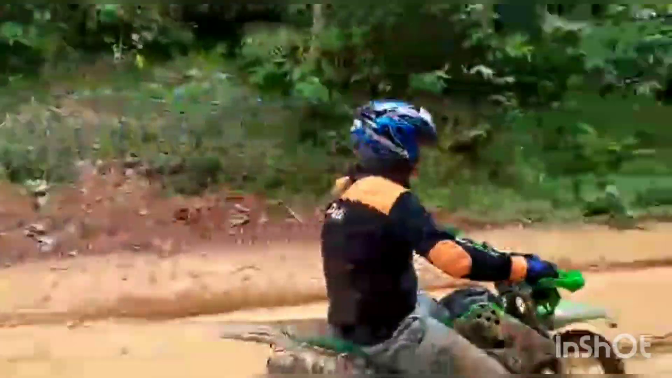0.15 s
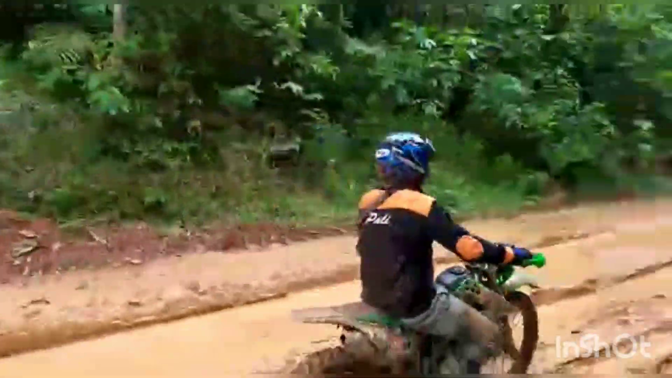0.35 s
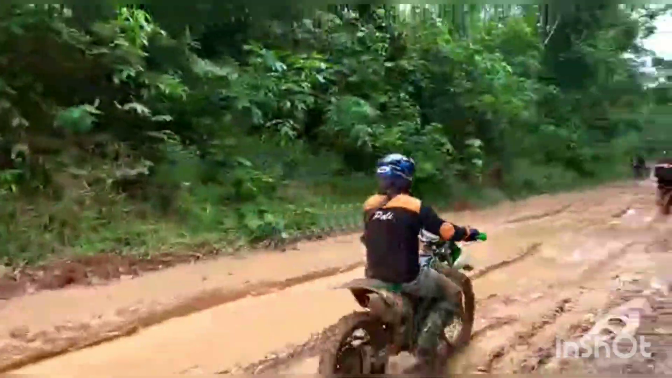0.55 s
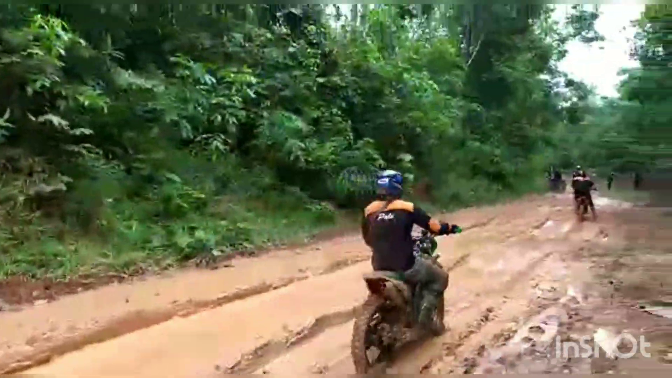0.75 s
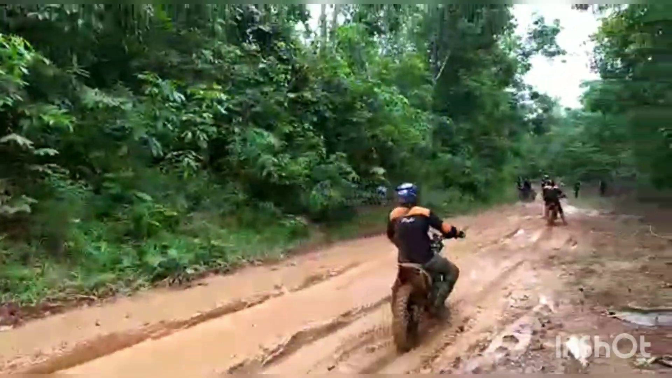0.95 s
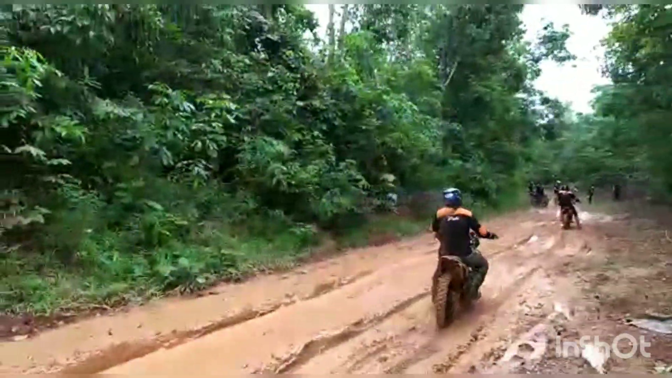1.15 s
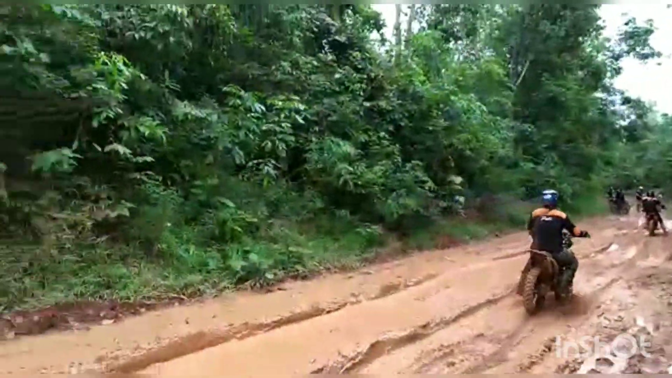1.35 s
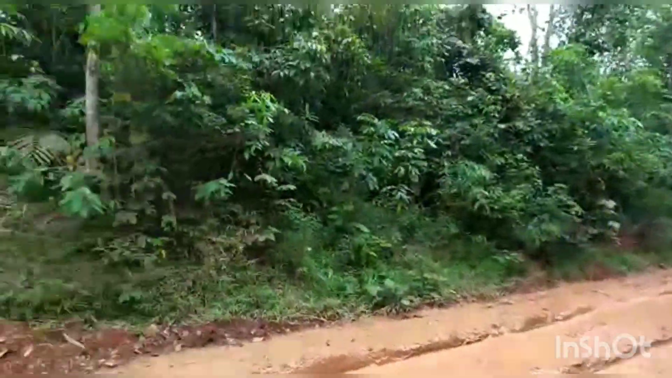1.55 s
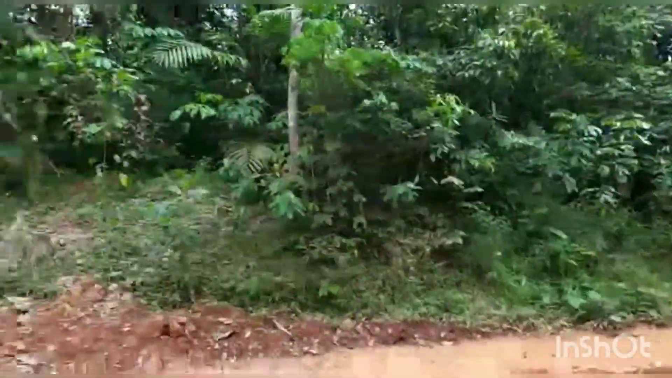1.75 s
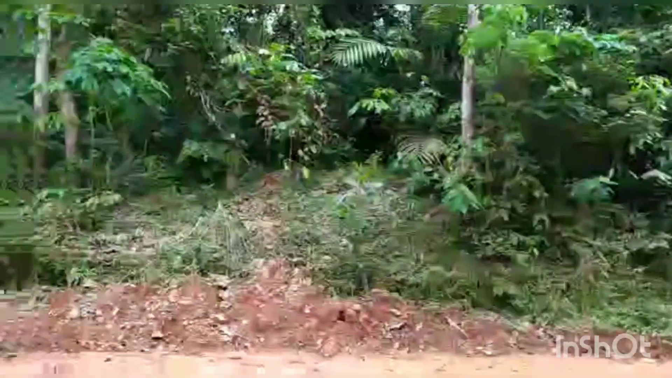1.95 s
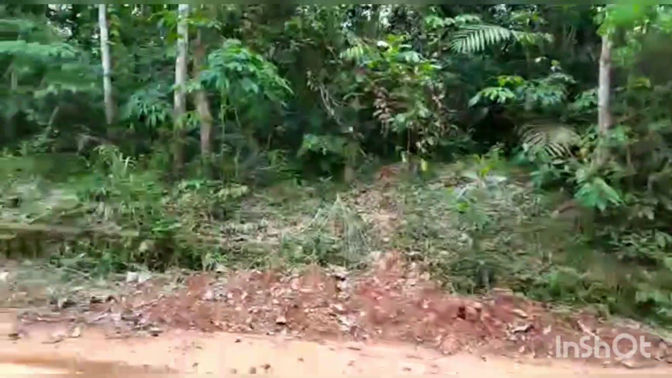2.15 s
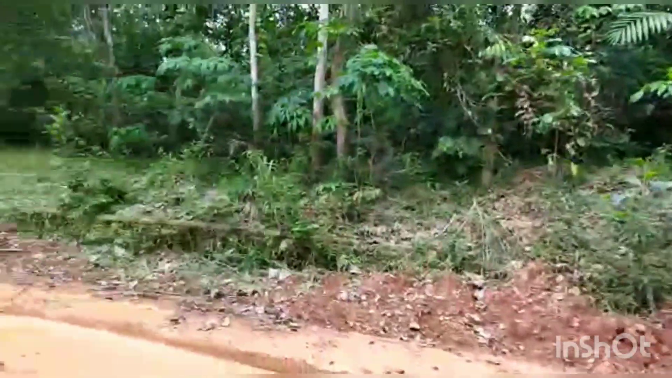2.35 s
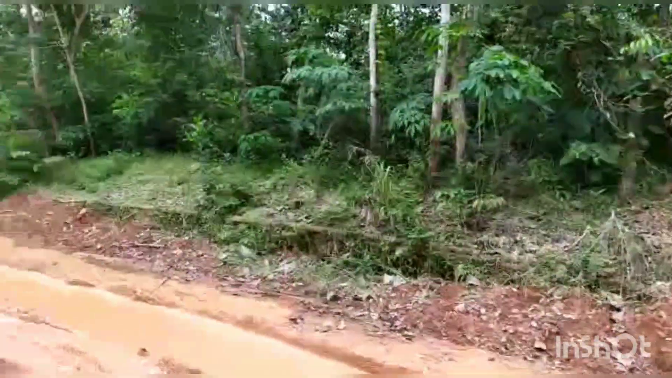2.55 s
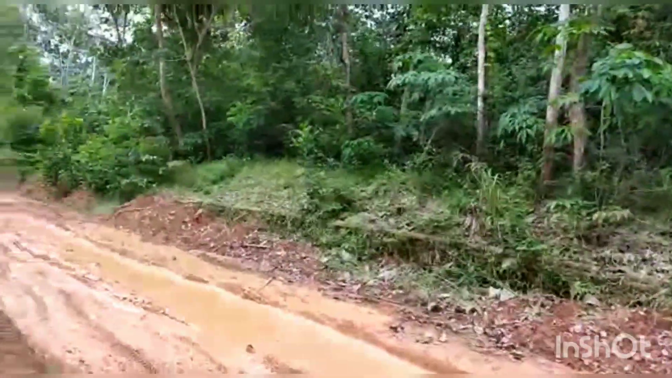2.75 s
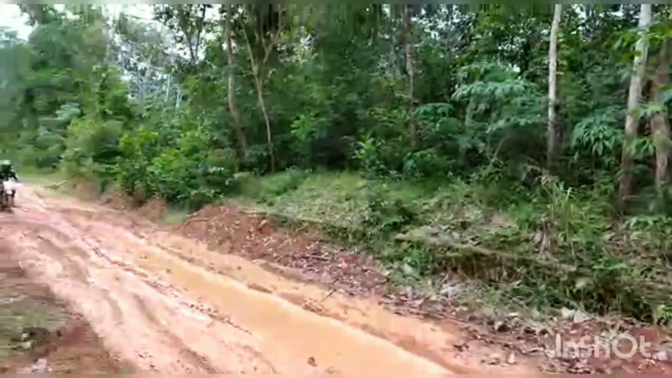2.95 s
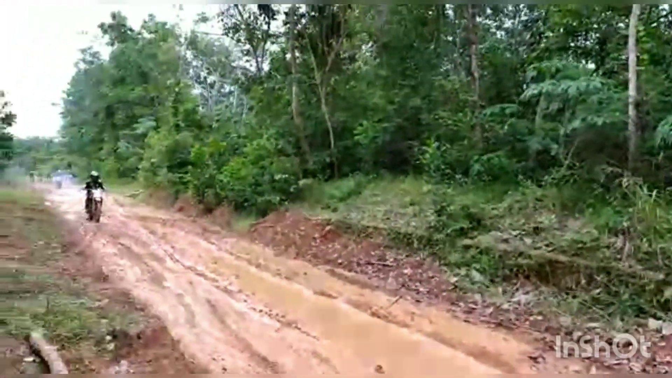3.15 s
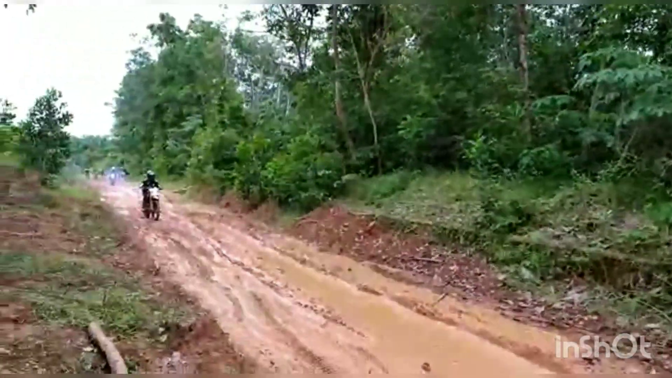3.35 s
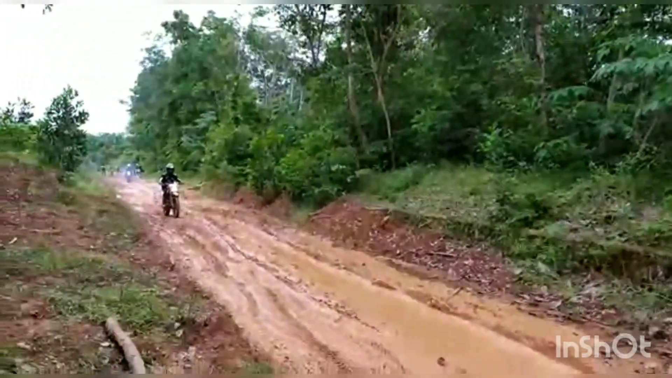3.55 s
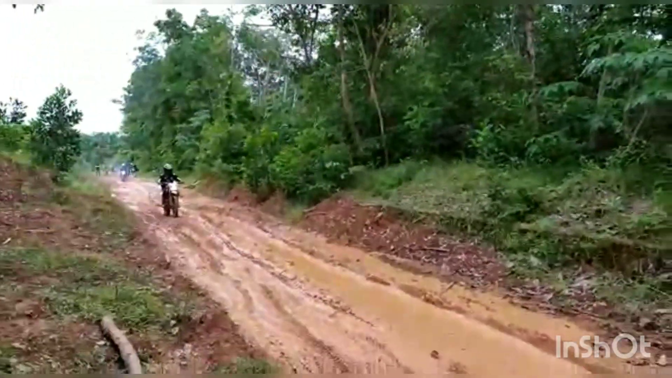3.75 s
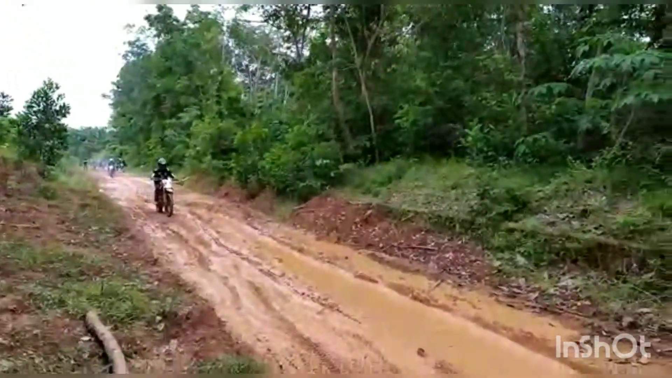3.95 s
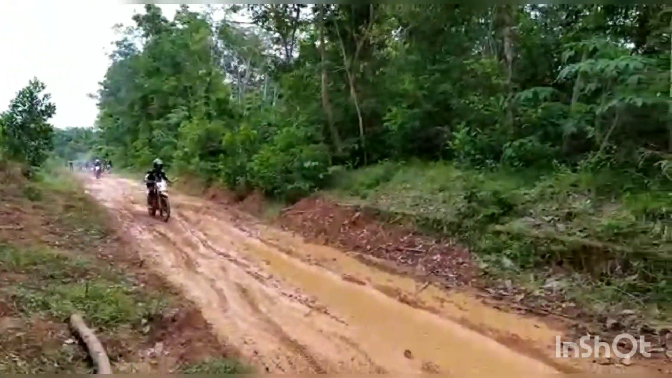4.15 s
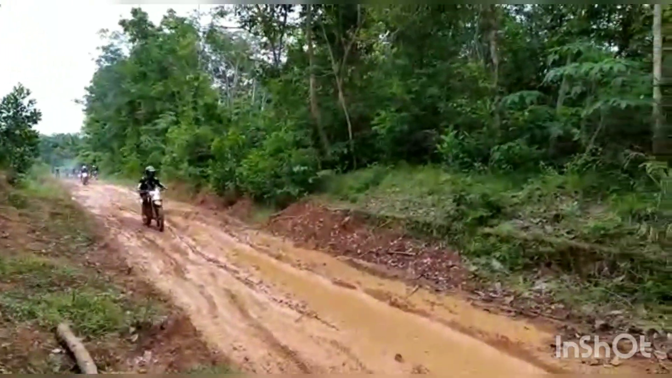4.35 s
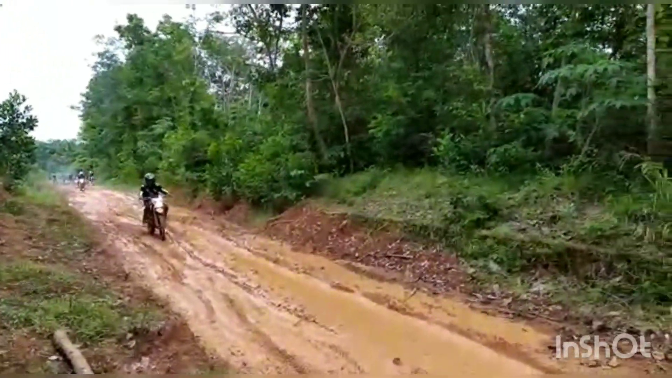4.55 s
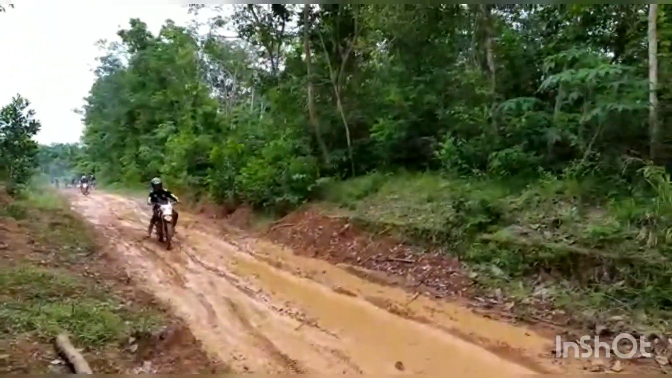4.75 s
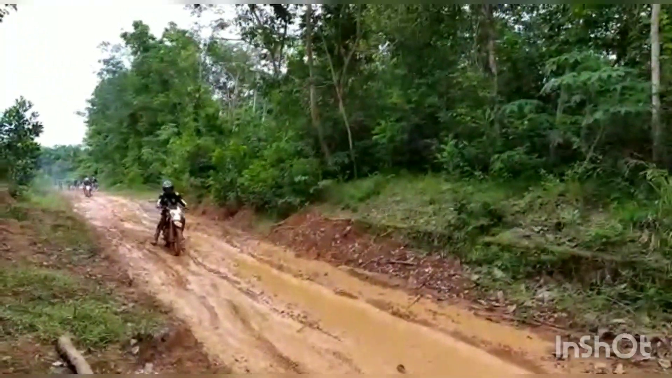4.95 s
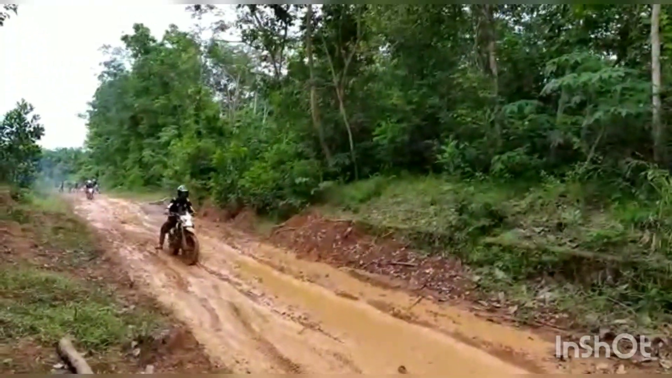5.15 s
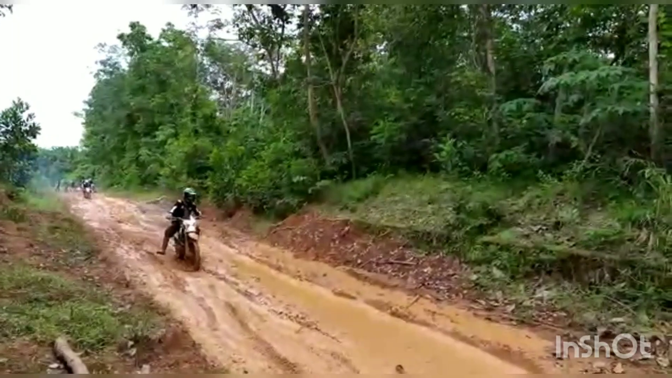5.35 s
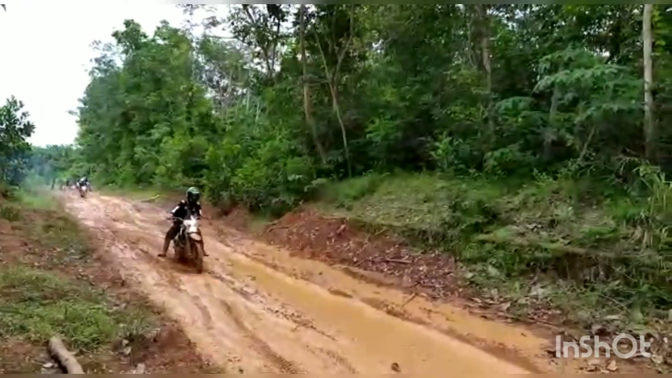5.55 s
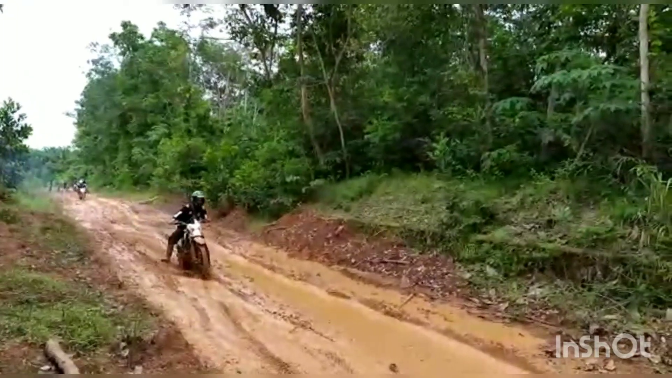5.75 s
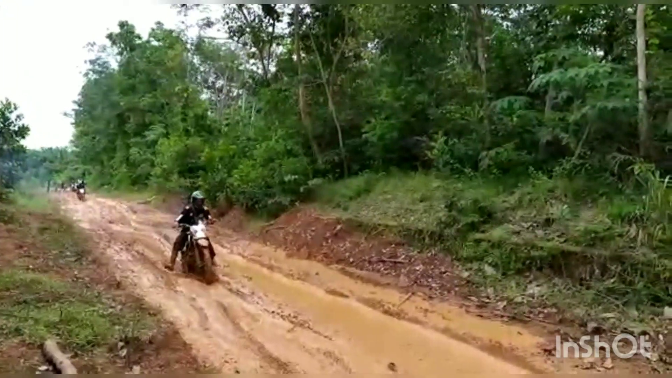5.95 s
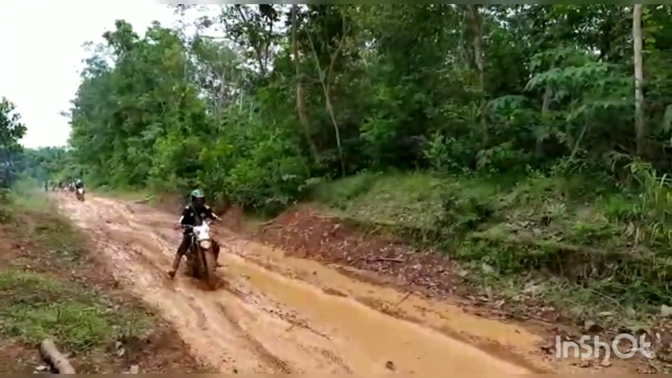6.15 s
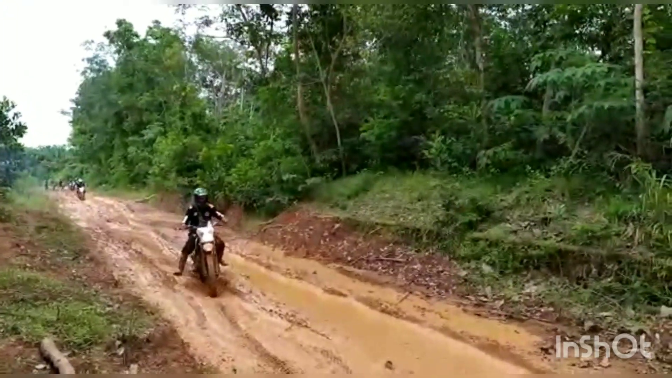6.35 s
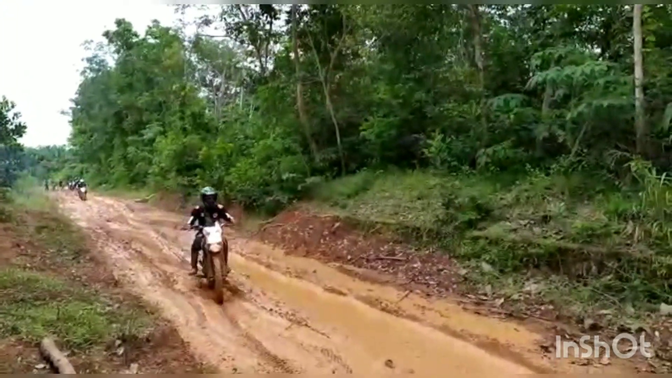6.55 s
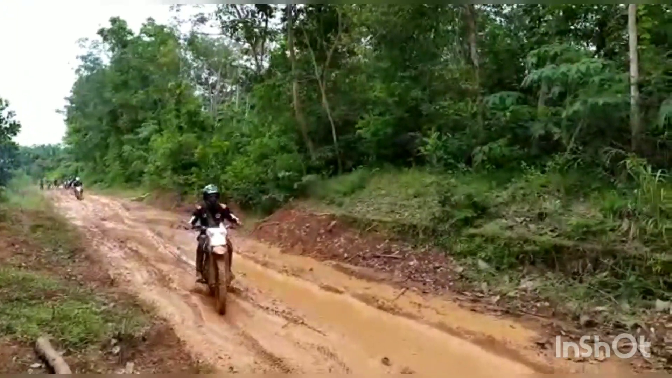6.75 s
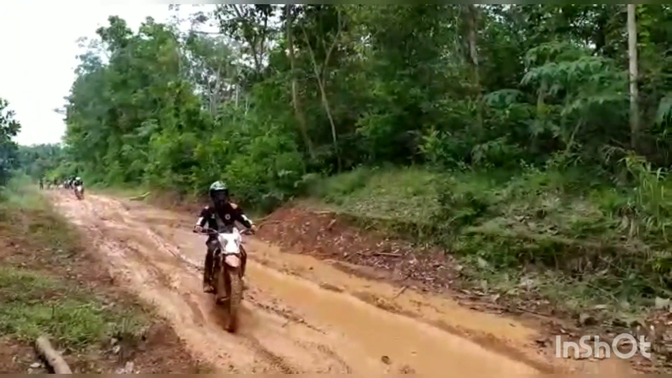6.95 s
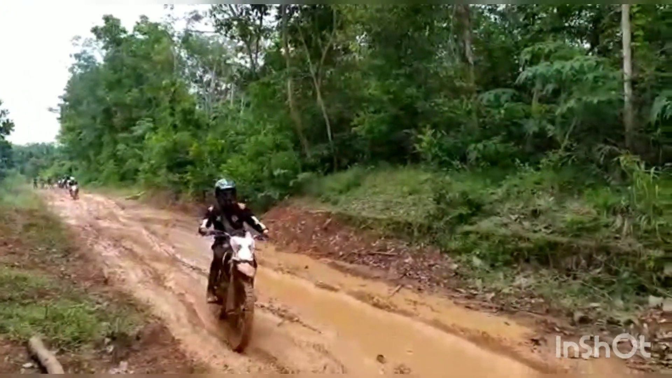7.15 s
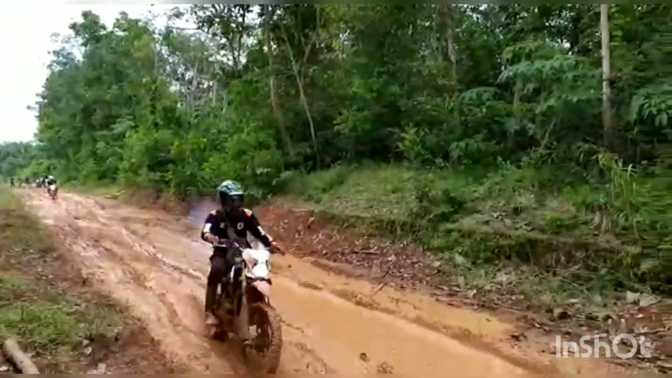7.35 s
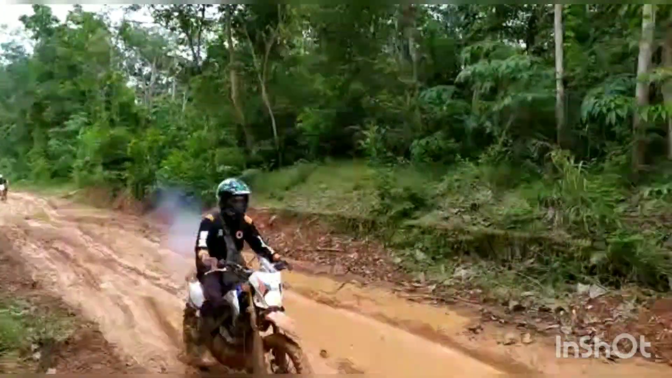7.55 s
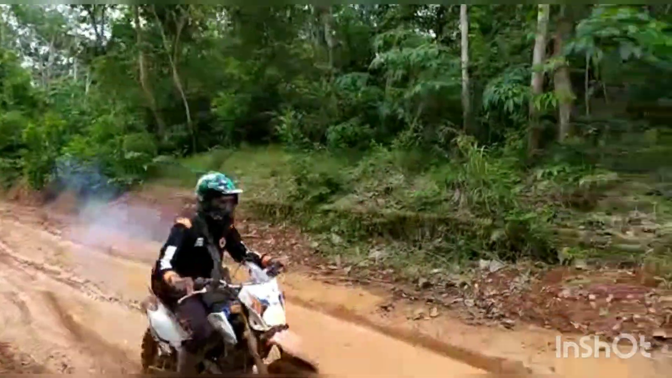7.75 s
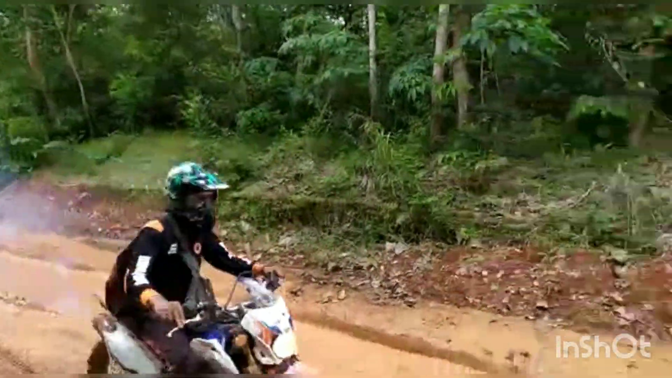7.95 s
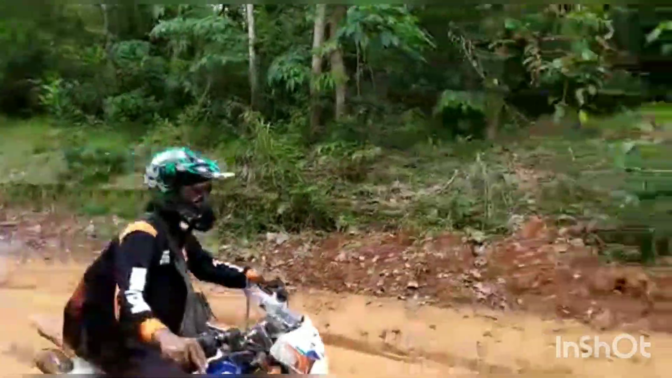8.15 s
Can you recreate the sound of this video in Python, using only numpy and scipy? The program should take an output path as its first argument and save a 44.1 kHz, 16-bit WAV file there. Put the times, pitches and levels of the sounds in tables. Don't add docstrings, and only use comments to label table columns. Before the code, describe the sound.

Raspy single-cylinder dirt bike engines outdoors: one pulls away, another putters through muddy ruts, then opens up and passes very close.

```python
import sys
import numpy as np
from scipy import signal
from scipy.fft import rfft, irfft
from scipy.io import wavfile
from scipy.ndimage import uniform_filter1d

SR = 44100
rng = np.random.default_rng(int(sys.argv[2]) if len(sys.argv) > 2 else 0)


def wav_record(signal):
    frames = np.transpose(np.atleast_2d(signal))
    bounded = np.clip(frames, -1, 1)
    quanta = np.round(bounded * 32767).astype(np.int16)
    wavfile.write(sys.argv[1], SR, quanta)


def how_loud(loudness_db):
    steps = np.asarray(loudness_db, float) / 20
    return 10 ** steps


N = 361619


def rms_one(x):
    return x / np.sqrt(np.mean(x ** 2) + 1e-20)


def in_time(rows):
    s, *columns = np.transpose(rows)
    return [np.interp(np.arange(N) / SR, s, column) for column in columns]


def at_hz(points, size):
    hz = np.maximum(np.arange(size // 2 + 1) * SR / size, 1)
    point_hz, point_db = np.array(points).T
    return np.interp(np.log(hz), np.log(point_hz), point_db)


def colour(x, points, size=8192):
    cepstrum = irfft(np.log(how_loud(at_hz(points, size))), size)
    cepstrum[1:size // 2] *= 2
    cepstrum[size // 2 + 1:] = 0
    response = irfft(np.exp(rfft(cepstrum)), size)
    return signal.fftconvolve(np.atleast_2d(x), response[None, :size // 2])[:, :N]


def voiced(pulses, spectrum):
    return colour(pulses, spectrum) / np.linalg.norm(colour(np.ones(1), spectrum))


def drift(rate_hz):
    r = np.exp(-2 * np.pi * rate_hz / SR)
    noise = rng.standard_normal(N + SR)
    settled = signal.lfilter([1], [1, -2 * r, r * r], noise)[SR:]
    return rms_one(settled)


def pair_noise(alike):
    both, left, right = rng.standard_normal((3, N))
    return np.sqrt(alike) * both + np.sqrt(1 - alike) * np.array([left, right])


def pipe(x, lag_s, g):
    gap = np.zeros(int(lag_s * SR) - 1)
    return signal.lfilter(np.r_[g, gap, -1], np.r_[1, gap, -g], x + 1e-18)


def running_gear(spectrum, split_hz=5000):
    hiss = 0
    for side in "low", "high":
        grains = how_loud(1.55 * (drift(146) + 0.5 * drift(6) + 0.55 * drift(3.4)))
        band = signal.butter(2, split_hz, side, fs=SR, output="sos")
        hiss = hiss + signal.sosfilt(band, pair_noise(0.07) * grains)
    return rms_one(colour(hiss, spectrum))


def throttle_opening(throttle):
    t, twist_s = np.arange(N) / SR, 0.019
    opening = np.zeros(N)
    for opens_s, shuts_s, amount in throttle:
        opened = np.clip((t - opens_s) / twist_s + 0.5, 0, 1)
        shut = np.clip((t - shuts_s) / twist_s + 0.5, 0, 1)
        opening += amount * (opened - shut)
    return opening


def load(revs, route, throttle, law, song):
    near_db, churn_db, broadside = in_time(route)
    opening = throttle_opening(throttle)
    on_song = 1 + song["by_throttle"] * opening + song["by_revs"] * revs
    drone = np.clip(broadside * on_song, 0, 1)
    voices = []
    for base_db, open_db, near_share, churn_share, rev_db in law:
        voices.append(base_db + open_db * opening + near_share * near_db + churn_share * churn_db + rev_db * revs)
    thump_db, bark_db, spit_db, hiss_db = voices
    thump_db = thump_db - law[0][1] * opening * np.clip(1.35 * drone, 0, 1)
    end_on = np.clip(1 - 2.5 * drone, 0, 1)
    bark_db = bark_db - song["end_on_loss_db"] * np.clip(1 - opening, 0, 1) * end_on
    return thump_db, bark_db, spit_db, hiss_db, drone


# (frequency [Hz], level [dB per Hz])
JET = [(350, -28), (600, 1), (1340, -5), (1490, -5.5), (2540, -13.5), (3710, -15.5), (5150, -14),
       (10200, -22.5), (15500, -47)]
# (frequency [Hz], level [dB per Hz])
TAILPIPE_RING = [(150, -26), (280, -2), (440, 3), (590, -4), (720, -28), (840, -12), (1100, -35),
                 (1600, -38.5)]
# (frequency [Hz], level [dB per Hz])
SHOCK_FRONT = [(1500, -36), (3000, -18), (6000, -13), (8500, -4), (10500, 0), (12500, -5), (15500, -16)]


def engine(speed, route, throttle, law, song, thump_body, bark_body, gear_hiss=None,
           drone_phase=0, crack_db=0, behind_s=0, drone_lag=0):
    (per_s,), t = in_time(speed), np.arange(N) / SR
    revs = np.clip(per_s - song["from_per_s"], 0, song["to_per_s"] - song["from_per_s"])
    thump_db, bark_db, spit_db, hiss_db, drone = load(revs, route, throttle, law, song)
    share = np.clip(drone, 0, 0.95)
    running = (t >= route[0][0]) & (t <= route[-1][0])
    fade = uniform_filter1d(running * 1.0, 600)

    cycles = np.cumsum(per_s) / SR
    cycles += 0.0015 * per_s - cycles[int(speed[0][0] * SR)]
    at = np.flatnonzero(np.diff(np.floor(cycles)) * running[1:])
    uneven_db = np.interp(per_s[at], [22, 32], [2.0, 0.7])
    thump_chance, bark_chance = rng.standard_normal((2, len(at))) * uneven_db
    unit = np.sqrt(SR / per_s[at])

    thump, bark = np.zeros((2, N))
    behind = (behind_s * SR * np.clip(1 - 2.5 * share[at], 0, 1)).astype(int)
    thump_at = np.minimum(at + behind, N - 1)
    thump[thump_at] = unit * how_loud(thump_db[at] + 0.5 + thump_chance) * np.sqrt(1 - share[at])
    late = (rng.random(len(at)) * 0.00025 * SR).astype(int)
    bark[np.minimum(at + late, N - 1)] = unit * how_loud(bark_db[at] + 6.0 + bark_chance)
    open_pipe = voiced(bark * (1 - 0.71 * share), bark_body)
    pulses = pipe(voiced(thump, thump_body) + open_pipe, lag_s=0.0019, g=0.6)
    pulses += voiced(-bark * share * how_loud(-8.0), TAILPIPE_RING)

    low_orders = np.cos(4 * np.pi * cycles + drone_phase - drone_lag * revs)
    low_orders += how_loud(-25.0) * np.cos(2 * np.pi * cycles)
    steady = np.sqrt(2 * share) * how_loud(thump_db) * low_orders
    if gear_hiss is None:
        return pulses + fade * steady

    since_s = cycles % 1 / per_s
    jet = rms_one(colour(pair_noise(0.66), JET))
    jet *= 0.5 + 1.9 * np.exp(-since_s / 0.005)
    crack = rms_one(colour(pair_noise(0.092), SHOCK_FRONT)) * np.exp(-since_s / 0.00076)
    steady = steady + how_loud(spit_db) * jet + how_loud(bark_db + crack_db) * crack
    steady += how_loud(hiss_db + 2.0) * running_gear(gear_hiss)
    return pulses + fade * steady


# (frequency [Hz], level [dB per Hz])
AIR_SPECTRUM = [(15, -3.5), (25, -56), (63, -9), (102, 6.5), (270, 9), (492, -2.5), (638, -8.5),
                (1200, -14.5), (1560, -100), (2640, -120)]


def moving_air():
    return how_loud(-41) * rms_one(colour(pair_noise(0.99), AIR_SPECTRUM))


# (time [s], firing rate [per s])
LEAVING_REVS = [(0.008, 48.49), (0.238, 40.97), (0.448, 34.55), (0.53, 39.32), (0.588, 46.75),
                (0.773, 37.26), (1.12, 28.34), (1.248, 40.53), (1.438, 45.53), (1.553, 40.11),
                (1.998, 27.07), (2.06, 30.6), (2.125, 35.8), (2.255, 35.6), (2.29, 28)]
# (time [s], exhaust nearness [dB], wheel churn [dB], broadside [0-1])
LEAVING_PATH = [(0, -3, 3, 0.48), (.3, 1, -2.6, 0.46), (0.602, -6, 2.5, 0.3), (.66, -2, -1.5, 0.03),
                (1.1, -10, -5.5, 0), (1.45, -8, -4.5, 0.03), (1.749, -8.5, -8, 0.04),
                (2.03, -9, -13.5, 0.06), (2.34, -11.5, -15, .04)]
# (opens [s], shuts [s], opening [0-1])
LEAVING_WRIST = [
    (-.02, 0.087, 0.83),
    (0.486, 0.62, 0.74),
    (1.149, 1.463, 0.92),
    (2.05, 2.285, 0.82),
]
# (level alongside [dB], full throttle adds [dB], share of nearness [-],
# share of churn [-], rise with revs [dB per extra firing a second])
LEAVING_VOICES = [(-13, -19, 0.23, 0.21, 0.33), (-22, 16, 1.45, 0, 0.41), (-28, 11, 0.83, 0.64, 0.26),
                  (-27.5, 5, 0.093, 1, 0.0738)]
# (frequency [Hz], level [dB per Hz])
LEAVING_SILENCER = [(30, -31.5), (45, -20), (60, -37), (85, 6), (112, 3.5), (165, 1.5), (210, -2.5),
                    (250, -8), (350, -24.5), (440, -21.5), (550, -25.5), (900, -81.5)]
LEAVING_OPEN_PIPE = [(30, -41), (54, -27), (71, -3.5), (119, -1), (169, 1), (284, -7), (338, -2),
                     (382, -12), (478, -8), (541, -15), (627, -16), (1110, -35.5), (3000, -63),
                     (5000, -49.5)]
LEAVING_GEAR = [(530, -30), (900, -7.5), (1230, -10.5), (1330, -8), (1770, -5), (2420, -3), (3710, -3.5),
                (4880, -10), (7230, -8.5), (10700, -14.5), (15500, -26)]


def leaving_bike():
    song = dict(from_per_s=28.7, to_per_s=35.1, by_throttle=2.34, by_revs=0.001, end_on_loss_db=8.8)
    return engine(LEAVING_REVS, LEAVING_PATH, LEAVING_WRIST, LEAVING_VOICES, song,
                  LEAVING_SILENCER, LEAVING_OPEN_PIPE, LEAVING_GEAR,
                  drone_phase=2.1, crack_db=-11, behind_s=0.004)


# (delay [s], level [dB])
REFLECTIONS = [
    (.016, -12),
    (.043, -18),
    (.071, -21),
    (.118, -23),
    (.19, -26),
]


def forest(x):
    dull = signal.sosfilt(signal.butter(2, 900, fs=SR, output="sos"), x)
    out = np.zeros((2, N))
    for k, (lag_s, db) in enumerate(REFLECTIONS):
        for port in range(2):
            lag = int(lag_s * SR * (1 + 0.005 * k * port))
            out[port, lag:] += how_loud(db) * dull[port, :N - lag]
    return out


# (time [s], length [s], level [dB], pitch [Hz])
MUD_THROWS = [
    (.34, .16, -28, 3350),
    (0.656, 0.29, -39, 3280),
    (1.55, 0.21, -55, 3030),
    (5.165, .16, -46, 9500),
    (6.4, .3, -48, 4200),
    (7.74, 0.085, -28, 4750),
    (7.92, .11, -28, 3660),
]


def sprays():
    width_oct, rise_s, grain_db = 0.37, 0.013, 3.0
    out = np.zeros((2, N))
    grains = pair_noise(0.13) * how_loud(grain_db * drift(60))
    for s, length_s, db, hz in MUD_THROWS:
        start, t = int(s * SR), np.arange(int(length_s * 1.3 * SR)) / SR
        here = slice(start, start + len(t))
        edges = hz * 2 ** (width_oct * hz / 4000 * np.array([-0.5, 0.5]))
        band = signal.sosfilt(signal.butter(2, edges, "band", fs=SR, output="sos"), grains[:, here])
        rise = np.clip(t / rise_s, 0, 1)
        thinning = np.clip(3 - 2 * t / length_s, 0, 1)
        out[:, here] += how_loud(db) * rms_one(band) * rise * thinning
    return out


# (frequency [Hz], level [dB per Hz])
COMING_SILENCER = [(30, -69.5), (42, -61), (56, -21.5), (70, -5.5), (86, 3), (100, -2), (120, -6),
                   (145, -8), (170, -5), (200, -16), (240, -15.5), (300, -33), (420, -45), (550, -72.5)]
# (time [s], firing rate [per s])
FAR_REVS = [(2.32, 35.7), (2.6, 33), (2.9, 35.77), (3.15, 40.19), (4.05, 24.5), (4.4, 24.46), (5.6, 24.12),
            (5.75, 26.22), (6.1, 25.3)]
# (time [s], exhaust nearness [dB], wheel churn [dB], broadside [0-1])
FAR_PATH = [(2.3, -22, -40, 0.072), (3.2, -9, -38, 0.04), (3.6, -13.5, -44, 0.11), (4.2, -12, -44, 0.055),
            (4.7, -10.5, -49, 0.066), (5.5, -24, -40, 0.068), (5.72, -11.5, -38, 0.065),
            (6.1, -40, -38, .08)]
# (level alongside [dB], full throttle adds [dB], share of nearness [-],
# share of churn [-], rise with revs [dB per extra firing a second])
FAR_VOICES = [(-17.5, 0, 1, 0, 0), (-40, 0, 0.74, 0, 0), (-30, 0, 0, 1, 0), (-19, 0, 0, 0.29, 0)]


def far_bike():
    song = dict(from_per_s=60, to_per_s=61, by_throttle=0, by_revs=0, end_on_loss_db=0)
    return engine(FAR_REVS, FAR_PATH, [], FAR_VOICES, song, COMING_SILENCER, LEAVING_OPEN_PIPE)


# (time [s], firing rate [per s])
COMING_REVS = [(2.355, 27.98), (2.87, 29.1), (2.96, 26.74), (3.725, 28.7), (4.41, 32.51), (5.1, 20.81),
               (5.61, 24.18), (5.635, 28.81), (6.135, 34.93), (6.275, 28.61), (6.505, 33.8), (7.07, 37.83),
               (7.265, 45.53), (7.59, 36.17), (7.745, 44.46), (7.875, 40.45), (8.045, 50.47), (8.2, 46.37)]
# (time [s], exhaust nearness [dB], wheel churn [dB], broadside [0-1])
COMING_PATH = [(2.33, -3.5, -12.5, 0.023), (3.15, -8.5, -13.5, 0.024), (3.9, -7.5, -19, 0.026),
               (4.2, -10.5, -23, 0.044), (4.5, -10.5, -15.5, 0.036), (5.15, -14.5, -12, 0.02),
               (5.37, -14.5, -10.5, 0.022), (5.5, -11, -9, 0.028), (6.05, -12, -9, 0.17),
               (6.5, -5.5, -6.5, 0.12), (6.95, -4, -3.5, 0.32), (7.099, -2.5, -4, 0.096),
               (7.25, -3, 1.3, 0.21), (7.6, -5, 1.5, 0.38), (7.82, -2, 2, 0.51), (8.0, 0.8, 3.5, 0.35),
               (8.07, -0.8, -3, .15), (8.2, -0.5, -1, 0.24)]
# (opens [s], shuts [s], opening [0-1])
COMING_WRIST = [(2.3, 2.384, 0.26), (2.708, 2.913, 0.63), (3.282, 4.014, 0.87), (4.023, 4.41, 0.39),
                (4.841, 4.91, 0.68), (5.375, 5.508, 0.89), (5.593, 5.754, 0.76), (5.93, 6.999, 0.9),
                (7.003, 7.14, 0.45), (7.144, 7.409, 0.87), (7.61, 7.89, 0.44), (7.898, 8.166, 0.94),
                (8.19, 8.3, 0.92)]
# (level alongside [dB], full throttle adds [dB], share of nearness [-],
# share of churn [-], rise with revs [dB per extra firing a second])
COMING_VOICES = [(-15.5, -7, 0.85, 0.15, 1.21), (-33.5, 14, 1.065, 0.0084, 0.036),
                 (-34.5, 10, 1.16, 0.38, 0.67), (-30, 3, 0.024, 0.98, 0.061)]
# (frequency [Hz], level [dB per Hz])
COMING_OPEN_PIPE = [(30, -40), (50, -33), (80, -3.5), (206, 4), (270, -3), (329, -1), (400, -9),
                    (478, -6.5), (612, -23.5), (728, -18.5), (1110, -44), (3000, -48), (5000, -79)]
COMING_GEAR = [(530, -21), (900, -0.5), (1200, -5), (1350, 1.5), (1560, -1), (2200, 3), (2510, 1),
               (4660, 0), (6050, -2.5), (11400, -9), (15500, -21.5)]


def coming_bike():
    song = dict(from_per_s=39.2, to_per_s=44.4, by_throttle=0.24, by_revs=0.2, end_on_loss_db=1)
    return engine(COMING_REVS, COMING_PATH, COMING_WRIST, COMING_VOICES, song,
                  COMING_SILENCER, COMING_OPEN_PIPE, COMING_GEAR,
                  drone_phase=-0.44, crack_db=-7, drone_lag=0.42)


# (time [s], left lag [samples])
PATH_DIFFERENCE = [(0, 8.5), (1, 8.5), (1.6, 5.5), (2, -14.5), (2.6, -15.5), (3, -5.5), (4.1, -21),
                   (4.5, 9.5), (7.1, 8.5), (7.6, 12), (8.2, 12)]


def scene():
    bikes = leaving_bike() + far_bike() + coming_bike()
    near = bikes + forest(bikes) + sprays()
    (left_lag,) = in_time(PATH_DIFFERENCE)
    near[0] = np.interp(np.arange(N) - left_lag, np.arange(N), near[0])
    return near + moving_air()


def low_pass(x):
    return signal.sosfilt(signal.butter(12, 15720, fs=SR, output="sos"), x)


# (frequency [Hz], left minus right [dB])
PORT_COLOUR = [(60, 0), (300, -.3), (700, 0), (1290, 1), (2380, 4), (4400, 3), (8120, -4), (15000, -13.5)]


def record(dry):
    left = colour(dry[0], [(hz, db / 2) for hz, db in PORT_COLOUR])
    right = colour(dry[1], [(hz, -db / 2) for hz, db in PORT_COLOUR])
    rounded = 0.98 * np.tanh(np.r_[left, right] / 0.98)
    top_cut = signal.cheby2(12, 70, 16600, fs=SR, output="sos")
    finished = signal.sosfilt(top_cut, rounded)
    return low_pass(finished)


dry = scene()
out = record(dry)
wav_record(out)
```